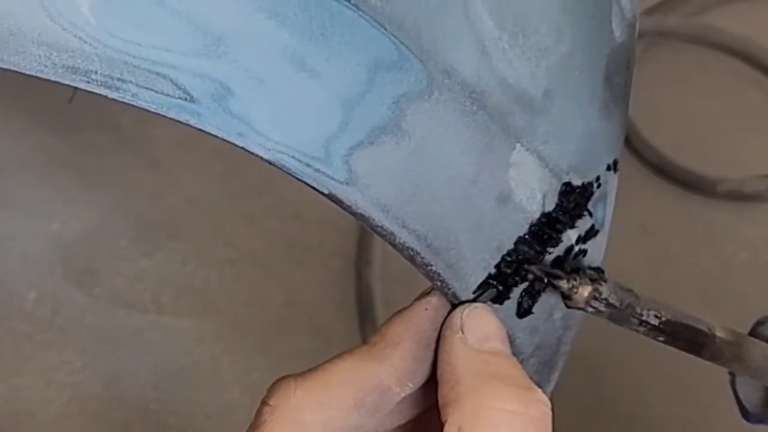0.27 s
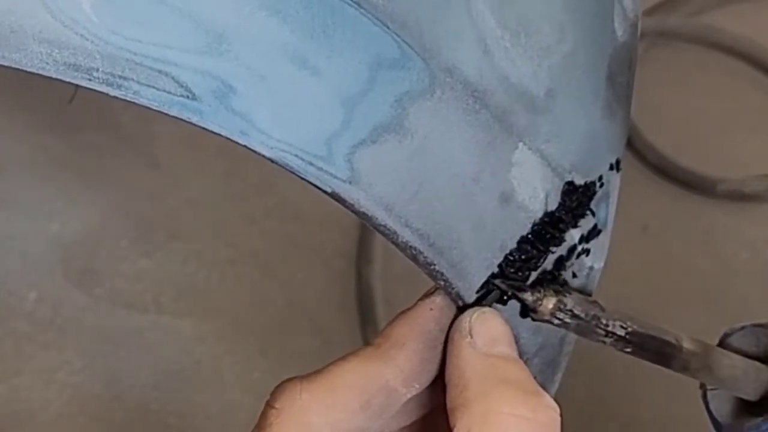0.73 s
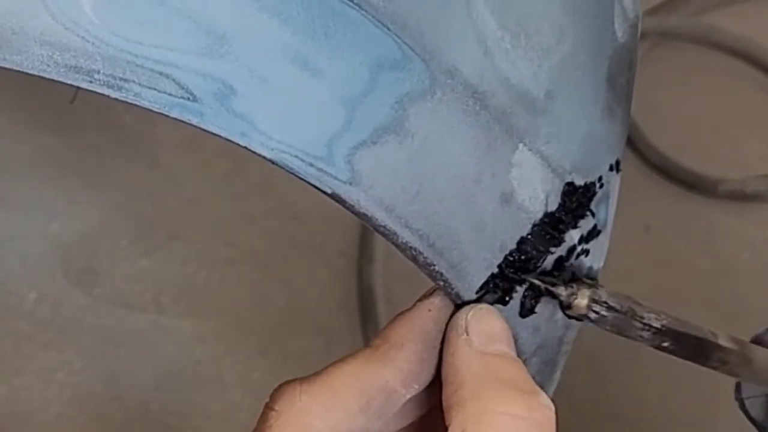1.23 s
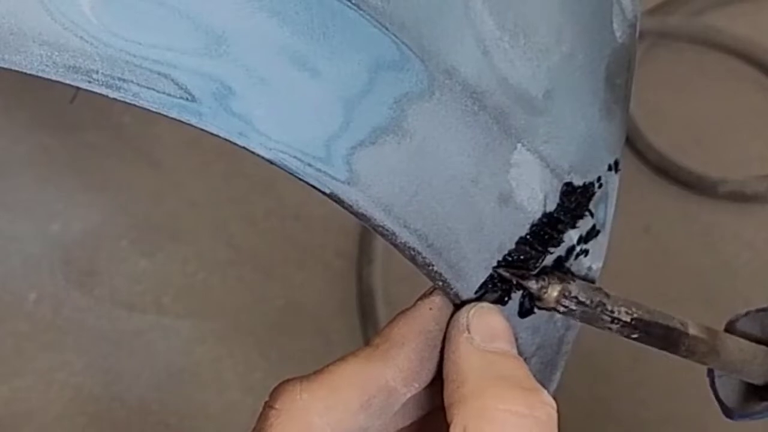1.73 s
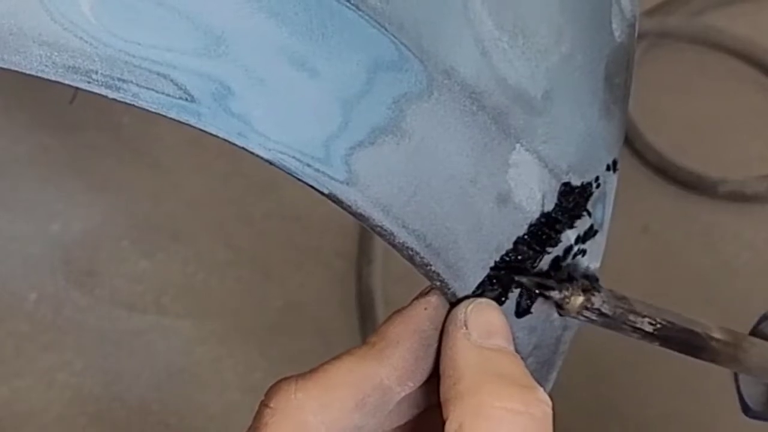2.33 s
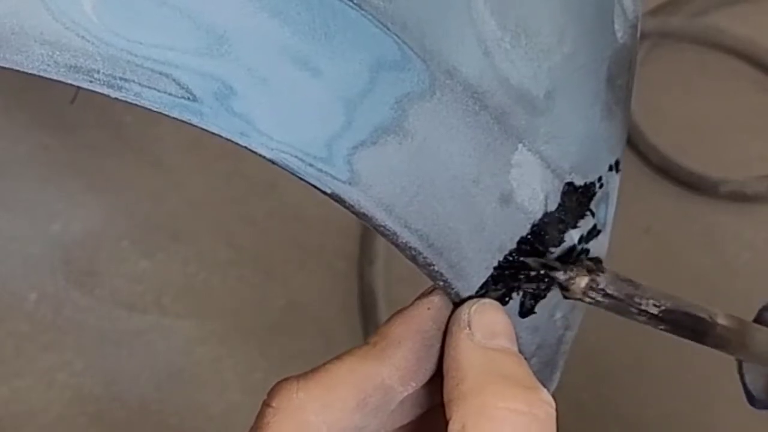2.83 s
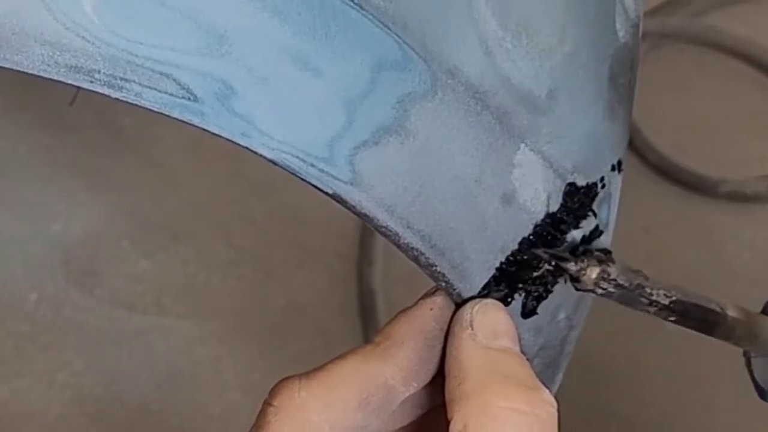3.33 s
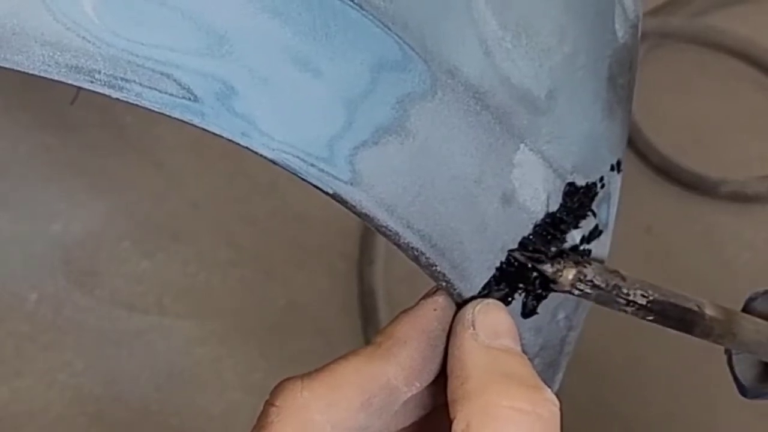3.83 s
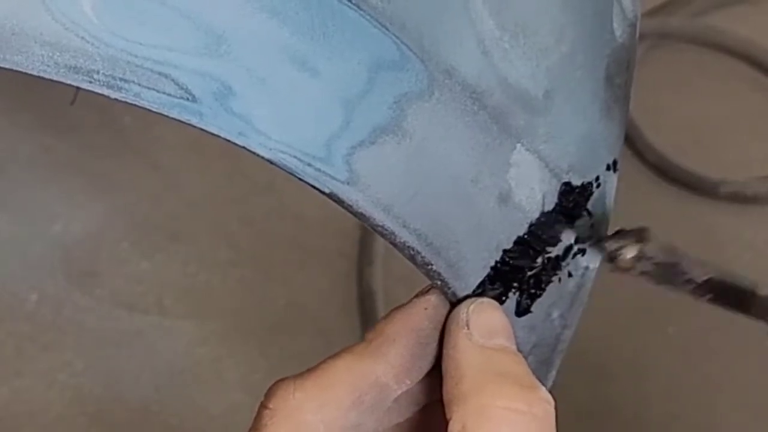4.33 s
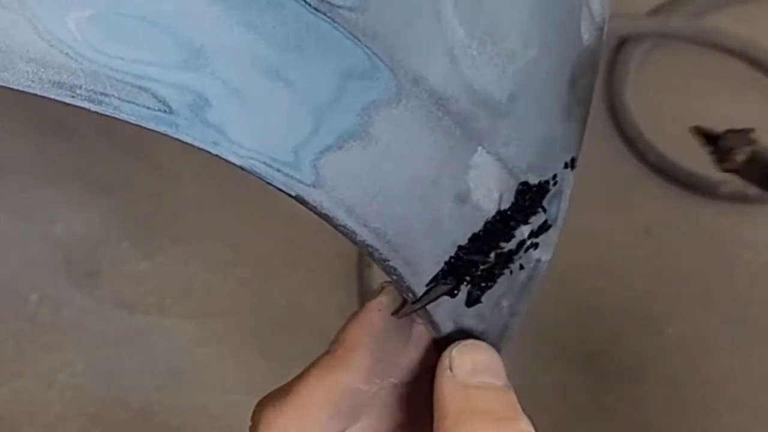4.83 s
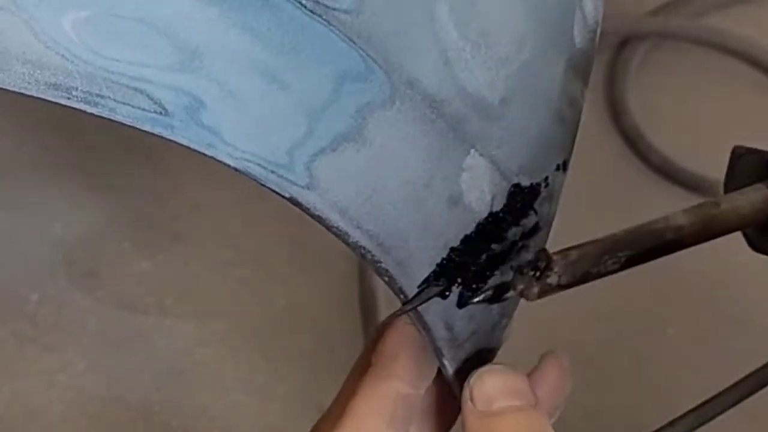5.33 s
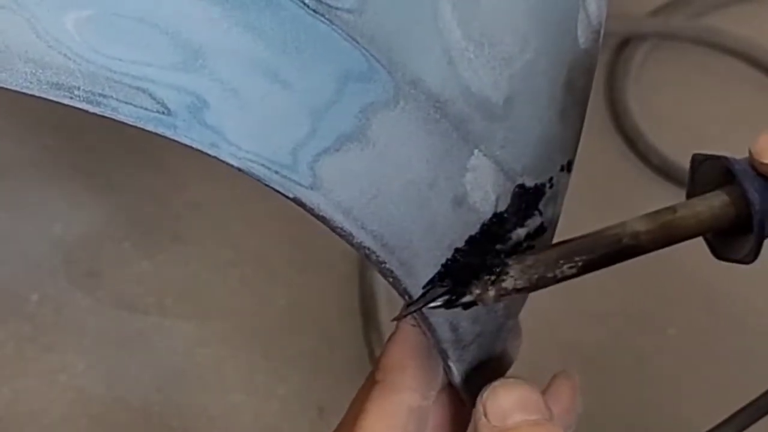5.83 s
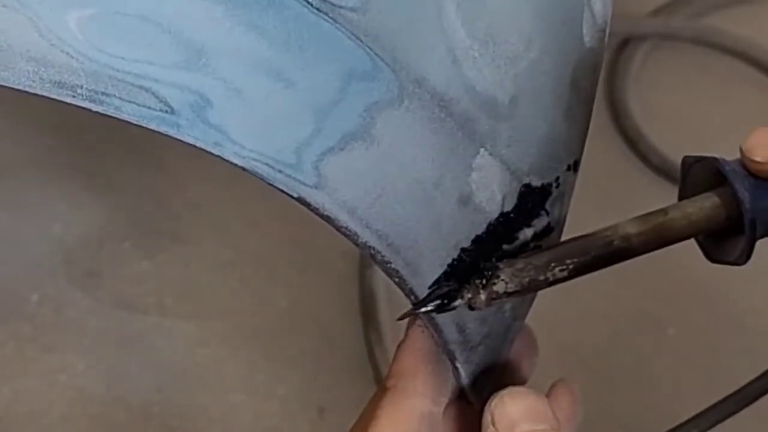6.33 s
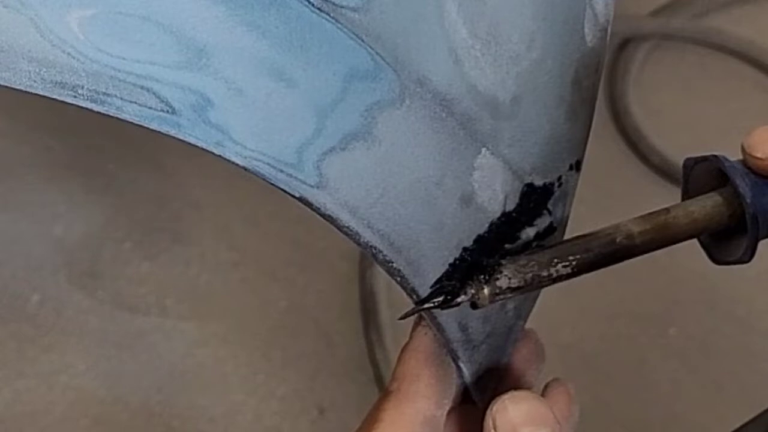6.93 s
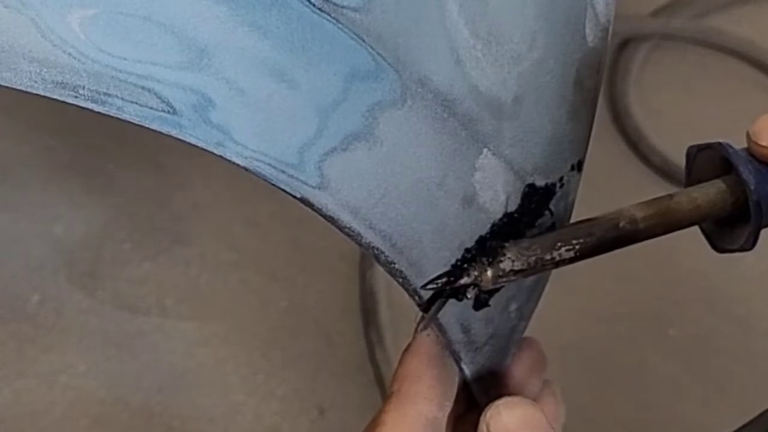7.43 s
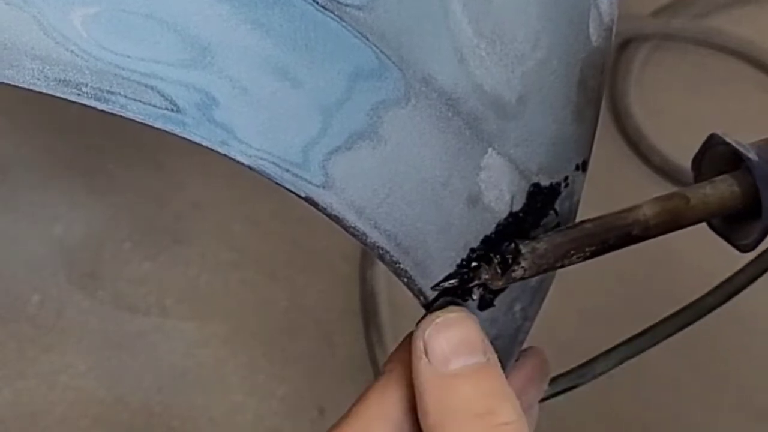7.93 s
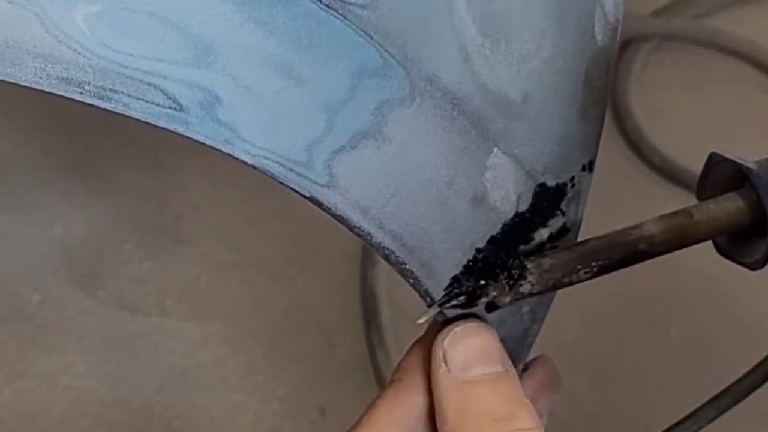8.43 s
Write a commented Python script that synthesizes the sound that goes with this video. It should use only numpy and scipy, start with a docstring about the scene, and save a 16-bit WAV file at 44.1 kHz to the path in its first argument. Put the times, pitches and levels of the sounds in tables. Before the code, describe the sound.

Low, even machinery drone and moving air, while a hot iron barely scrapes soft plastic and ticks lightly.

```python
"""Workshop machine drone and hot iron

A machine drones: mains overtones, the lower ones flanked by side tones from a slowly turning belt
and pulley. Each tone sits at its own place between two microphones in the room's standing waves.
Close by, a hot iron and fingers faintly stroke soft plastic, and the iron's tip ticks.
Moving air rumbles and rushes behind."""
import sys
import numpy as np
from scipy import signal
from scipy.fft import rfft, irfft, next_fast_len
from scipy.io import wavfile
from scipy.ndimage import uniform_filter1d, map_coordinates

SR = 44100
rng = np.random.default_rng(int(sys.argv[2]) if len(sys.argv) > 2 else 0)


def dump_mix(stems):
    """Bounce the given channels to the path in sys.argv[1] as a 16-bit WAV at rate SR."""
    frames = np.atleast_2d(stems).T  # one column per channel
    limited = np.clip(frames, -1, 1)  # hard clip at full scale
    pcm = np.round(limited * 32767).astype(np.int16)
    wavfile.write(sys.argv[1], SR, pcm)


N = 382788


def amp(db):
    """dB to gain."""
    return 10 ** (np.asarray(db) / 20)


def unit_rms(x):
    """x scaled to rms 1."""
    return x / np.sqrt(np.mean(x ** 2))


def curve_at(table, hz):
    """Value columns of a (f/Hz, ...) table, interpolated over log frequency."""
    knots_hz, *columns = np.transpose(table)
    return np.array([np.interp(np.log(hz + 1), np.log(knots_hz + 1), c) for c in columns])


def wobble(rate_hz):
    """Smooth random curve, rate_hz knots a second."""
    knots = rng.standard_normal(int(N * rate_hz / SR) + 4)
    return map_coordinates(knots, [np.arange(N) * rate_hz / SR])


def filtered(x, response):
    """x through the frequency response given as response(hz)."""
    size = next_fast_len(N + SR // 2)
    return irfft(rfft(x, size) * response(np.fft.rfftfreq(size, 1 / SR)), size)[..., :N]


def room_tone(phase_rad, level_db, pan_db, lead_rad, waver_db=0.74):
    """Wavering sine in the standing waves; pan and lead are left minus right."""
    side = np.array([[.5], [-.5]])
    gain = amp(level_db + waver_db * wobble(1.986))
    wave = gain * np.exp(1j * (phase_rad + rng.uniform(0, 2 * np.pi)))
    placement = unit_rms(amp(side * pan_db)) * np.exp(1j * side * lead_rad)
    return np.sqrt(2) * np.real(placement * wave)


MAINS_HZ, BELT_HZ, PULLEY_HZ = 49.966, 7.57, 12.12
# mains multiple, rms level/dB, pan/dB, lead/rad
MAINS_OVERTONES = [(1, -49.8, -3.1, 0.35), (2, -47.3, 2.1, 0.64), (3, -57.5, -6.9, 0.21),
                   (4, -29.8, -0.7, 0.16), (5, -28.4, 0.9, -0.1), (6, -38.4, -0.5, 0.66),
                   (7, -47.1, -2.6, -0.47), (8, -48.4, 1.3, 0.69), (9, -51.2, 1.0, -1.26),
                   (10, -48.9, 2.1, 0.33), (11, -47.2, -5.8, 0.66), (12, -61.5, -2.2, -1.14),
                   (14, -58.6, -1.4, 0.65), (15, -47.6, 9.9, -1.76), (16, -60.4, -3.0, -1.08),
                   (20, -64.7, -4.8, 2.26), (22, -63.0, 0.4, 2.75), (24, -56.9, -2.5, 1.88),
                   (26, -66.8, 8.1, -1.21)]


def machine_drone():
    """Hum and flutter: each tone's phase sums whole multiples of three drifting rotation angles."""
    rad_per_hz = 2 * np.pi * np.arange(N) / SR
    mains_rad = MAINS_HZ * rad_per_hz + .03 * wobble(.4)
    belt_rad = BELT_HZ * rad_per_hz + .08 * wobble(.5)
    pulley_rad = PULLEY_HZ * rad_per_hz + .2 * wobble(.3)
    hum = sum(room_tone(k * mains_rad, *mix) for k, *mix in MAINS_OVERTONES)
    flutter = sum(room_tone(k * mains_rad + m * belt_rad + n * pulley_rad, *mix)
                  for k, m, n, *mix in side_tones())
    return hum + flutter


# mains multiple, belt multiple, pulley multiple, rms level/dB
CLEAR_SIDE_TONES = [(1, -2, 1, -48.9), (1, 0, -1, -39.7), (1, 0, 1, -49.5), (2, 1, 0, -46.3),
                    (2, 2, 0, -49.8), (3, -2, 1, -49.1), (3, -1, 0, -47.8), (3, 0, -1, -46.6),
                    (3, 0, 1, -45.6), (3, 1, -1, -53.1), (3, 1, 0, -46.0), (4, -1, 0, -42.4),
                    (4, 0, -1, -50.4), (4, 0, 1, -52.8), (4, 1, -2, -47.3), (4, 1, 0, -45.2),
                    (5, -2, 1, -51.3), (5, 1, 0, -42.7), (5, 2, -1, -46.9), (6, -1, 0, -44.6),
                    (6, -2, 1, -54.6), (7, -1, 0, -51.8), (8, -1, 0, -53.2), (9, -1, 0, -50.6),
                    (9, -2, 0, -55.8), (9, 1, -2, -54.6), (11, -1, 0, -56.1), (11, 1, 0, -52.7)]
# offsets from an overtone: belt multiple, pulley multiple
FAINT_SIDE_STEPS = [(-2, 0), (-1, 0), (1, 0), (2, 0), (0, -1), (0, 1)]
# f/Hz, pan/dB, lead/rad, share of scatter
SIDE_TONE_PLACES = [(40, -3, .4, 0), (65, -3, .45, 0), (107, 5, -.1, .05), (135, -1.5, .1, .05),
                    (200, .5, .1, .1), (265, .5, -.15, .1), (340, -4, .2, .4), (560, -3, .5, 1)]


def side_tones(top_multiple=11, spread_db=4, scatter_db=4, scatter_rad=.9):
    """Belt and pulley sidebands. Rows: three multiples, level/dB, pan/dB, lead/rad."""
    speeds_hz = [MAINS_HZ, BELT_HZ, PULLEY_HZ]
    taken = {row[:3] for row in CLEAR_SIDE_TONES}
    faint = [(k, m, n) for k in range(1, top_multiple + 1)
             for m, n in FAINT_SIDE_STEPS if (k, m, n) not in taken]
    air_db = curve_at(AIR_RUMBLE + AIR_RUSH, np.dot(faint, speeds_hz))[0]
    faint_db = air_db + spread_db * rng.standard_normal(len(faint))
    tones = np.vstack([CLEAR_SIDE_TONES, np.column_stack([faint, faint_db])])
    pan_db, lead_rad, share = curve_at(SIDE_TONE_PLACES, tones[:, :3] @ speeds_hz)
    scatter = share[:, None] * (scatter_db, scatter_rad) * rng.standard_normal((len(tones), 2))
    return np.hstack([tones, np.transpose([pan_db, lead_rad]) + scatter])


# t/s, level/dB, length/s
FIRM_STROKES = [(.49, -64, .04), (1.02, -65, .06), (3.13, -65, .04), (3.4, -64, .05), (3.785, -59, .06),
                (3.92, -64, .06), (4.13, -65, .07), (4.89, -62, .05), (5.085, -62, .045), (5.67, -62, .08),
                (7.98, -64, .06), (8.345, -64, .04)]


def stroke_envelope(light_per_s=1.5, light_db=-69, spread_db=1.5, light_s=.06, rise_share=.125):
    """Firm strokes plus light ones at random times; each rises fast and fades, and powers add."""
    draws = rng.uniform(size=(round(light_per_s * N / SR), 2))
    light_strokes = [(when * N / SR, light_db + spread_db * (2 * force - 1), light_s)
                     for when, force in draws]
    power = np.zeros(N + SR)
    t = np.arange(SR // 2) / SR
    for start_s, level_db, length_s in FIRM_STROKES + light_strokes:
        progress = t / length_s
        stroke = amp(level_db) * (1 - np.exp(-progress / rise_share)) * np.exp(-progress ** 2)
        power[round(start_s * SR):][:len(t)] += stroke ** 2
    return np.sqrt(power[:N])


# f/Hz, relative level/dB
SCRAPE_SPECTRUM = [(1500, -30), (3000, 2), (6000, -1), (9000, -4), (13000, -2), (16000, -4)]


def plastic_strokes(roughness_db=1.5, pan_db=5):
    """Strokes of iron and fingers on soft plastic: faint grainy hiss, nearer the left microphone."""
    noise = rng.standard_normal((2, N))
    hiss = unit_rms(filtered(noise, lambda hz: amp(curve_at(SCRAPE_SPECTRUM, hz)[0])))
    envelope = stroke_envelope() * amp(roughness_db * wobble(90))
    return envelope * hiss * amp([[pan_db / 2], [-pan_db / 2]])


# t/s, onset level before band-pass/dB, pan/dB
TIP_TICKS = [(3.761, -53, 1.5), (3.7873, -40, 3), (4.132, -52, 2)]


def iron_ticks(t60_s=.01, band_hz=(3800, 14000)):
    """The tip ticks on the plastic: dry, bright noise bursts."""
    t = np.arange(SR // 50) / SR
    ticks = np.zeros((2, N))
    for start_s, level_db, pan_db in TIP_TICKS:
        burst = amp(level_db - 60 * t / t60_s) * rng.standard_normal(len(t))
        ticks[:, round(start_s * SR):][:, :len(t)] += amp([[pan_db / 2], [-pan_db / 2]]) * burst
    return signal.sosfilt(signal.butter(2, band_hz, "band", fs=SR, output="sos"), ticks)


# f/Hz, left-right correlation
AIR_CORRELATION = [(25, 0.98), (60, .9), (130, 0.88), (290, .94), (640, 0.31), (1410, -0.27), (3100, 0.091),
                   (15000, -0.23)]


def air_noise(patchy_db=0.78):
    """Patchy noise, alike at both microphones in the bass, nearly unrelated in the treble."""
    def mid_side_gains(hz):
        angle_rad = np.arccos(np.clip(curve_at(AIR_CORRELATION, hz)[0], -1, 1)) / 2
        return np.array([np.cos(angle_rad), np.sin(angle_rad)])

    spectra = signal.stft(rng.standard_normal((2, N)), nperseg=512)[2]
    patches = rng.standard_normal(spectra.shape[1:])
    patches = uniform_filter1d(patches, size=8, axis=0)  # over frequency
    patches = uniform_filter1d(patches, size=12, axis=1)  # over time
    noise = signal.istft(spectra * amp(patchy_db * unit_rms(patches)), nperseg=512)[1][:, :N]
    mid, side = filtered(unit_rms(noise), mid_side_gains)
    return np.array([mid + side, mid - side])


# f/Hz, level in a 1 Hz band/dB, pan/dB
AIR_RUMBLE = [(20, -78.5, 2), (35, -66, -4), (55.4, -57, -4), (74, -68.5, 0), (110, -67.5, 3),
              (131, -63, 1.5), (149, -66.5, 0.5), (171.5, -57.5, -1.5), (171, -66, -0.5),
              (250, -60.5, -2.5), (284, -65, -4), (325, -62, -2.5), (380, -65.5, 1.5), (442, -59.5, -1)]  # low room resonances
AIR_RUSH = [(462, -63, 1.5), (525, -63.5, -3.5), (645, -71, 1), (748, -67.5, -1.5), (875, -76, 0.5),
            (920, -74, 0), (1130, -78.5, 0), (1280, -77, 0.5), (1530, -82.5, 0), (2010, -83, 0),
            (2340, -86, 1), (2970, -90, 1), (4420, -95.5, 0)]
PORT_HISS = [(6650, -101, -5.5), (7000, -102, -4), (8100, -107, 7.5), (8600, -109, 6), (10000, -109, 5),
             (11400, -108, 4), (12200, -111, 6), (13500, -112, 5), (14500, -112, 5), (15400, -115, 4.5)]  # coloured differently by each microphone port
# dips between standing waves: f/Hz, half width/Hz, depth/dB
ROOM_DIPS = [(275, 3.7, 2.5), (295, 5.9, 5), (293, 6.9, 6.5), (422, 7.1, 6.5), (459.6, 8.2, 6.5),
             (525, 9, 3.5), (714, 12, 2)]


def moving_air(swell_db=1.0, lead_rad=0.23, low_cut_hz=12, treble_hz=3500):
    """Rumble, rush and hiss coloured by the room; the treble swells and sinks."""
    def colour(hz):
        level_db, pan_db = curve_at(AIR_RUMBLE + AIR_RUSH + PORT_HISS, hz)
        for centre_hz, width_hz, depth_db in ROOM_DIPS:
            level_db -= depth_db * np.exp(-((hz - centre_hz) / width_hz) ** 2)
        gain = np.sqrt(SR / 2) * amp([level_db + pan_db / 2, level_db - pan_db / 2])
        phase_shift = np.exp([[.5j * lead_rad], [-.5j * lead_rad]])  # left is reached first
        return gain * phase_shift * (hz > low_cut_hz)

    flow = filtered(air_noise(), colour)
    treble = filtered(flow, lambda hz: hz ** 2 / (hz ** 2 + treble_hz ** 2))
    return flow + treble * (amp(swell_db * wobble(9.9)) - 1)


def scene():
    """Machine, air, strokes and ticks in stereo."""
    return machine_drone() + moving_air() + plastic_strokes() + iron_ticks()


BAND_LIMIT_HZ = 15460


def record(dry):
    """Brick-wall low-pass."""
    return filtered(dry, lambda hz: hz < BAND_LIMIT_HZ)


dry = scene()
out = record(dry)
dump_mix(out)
```